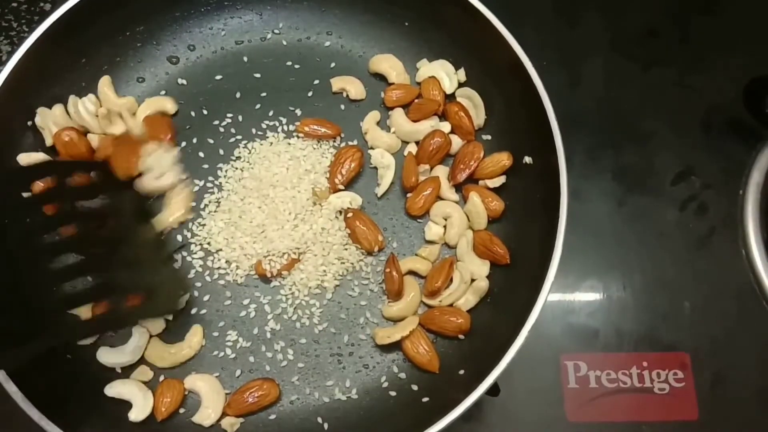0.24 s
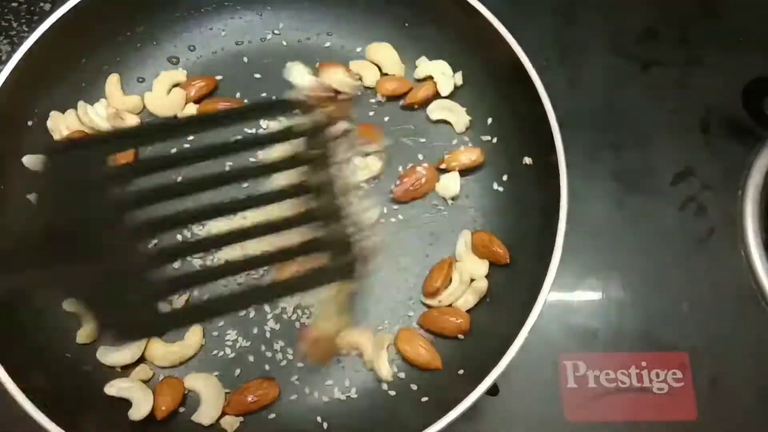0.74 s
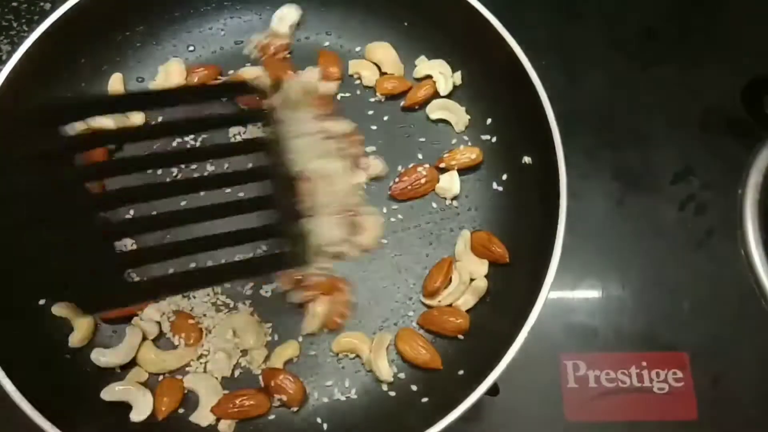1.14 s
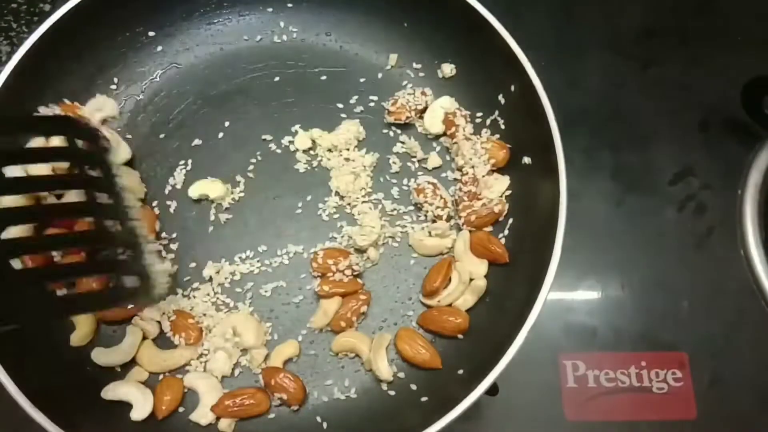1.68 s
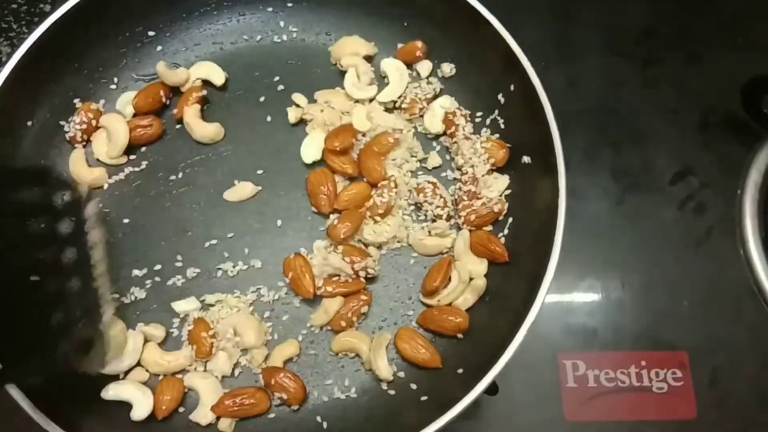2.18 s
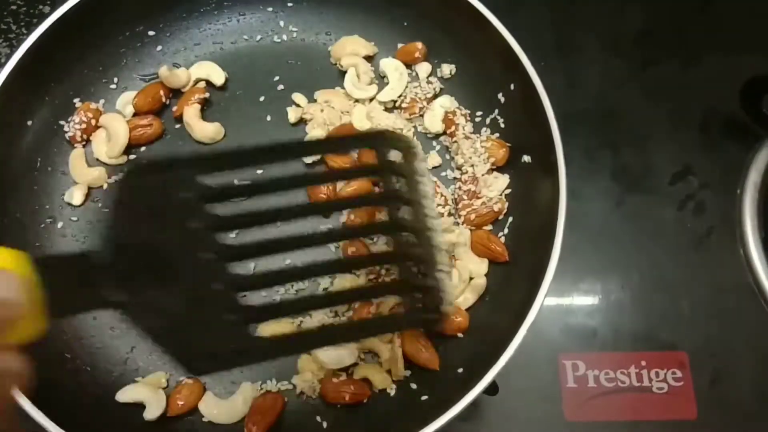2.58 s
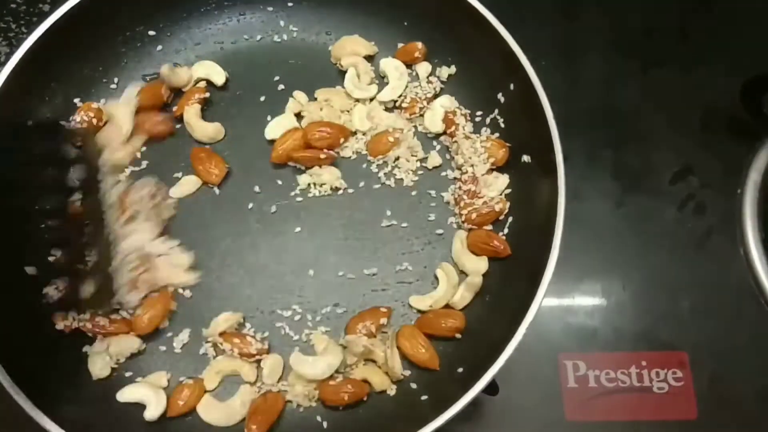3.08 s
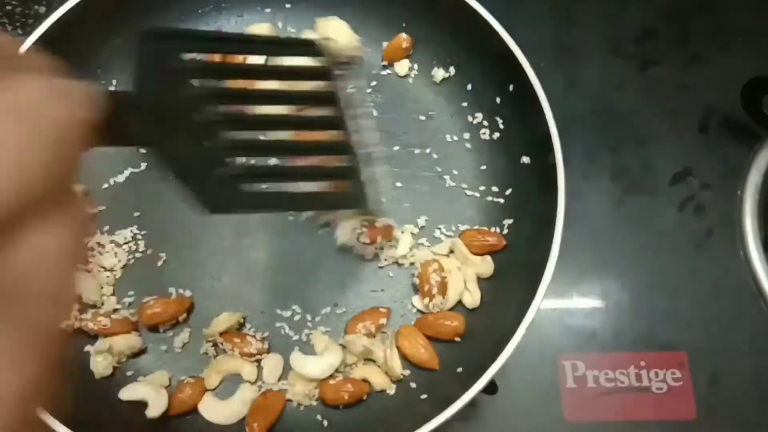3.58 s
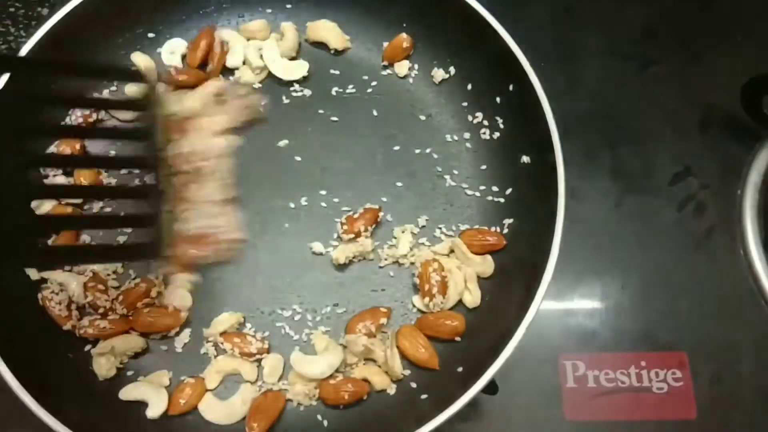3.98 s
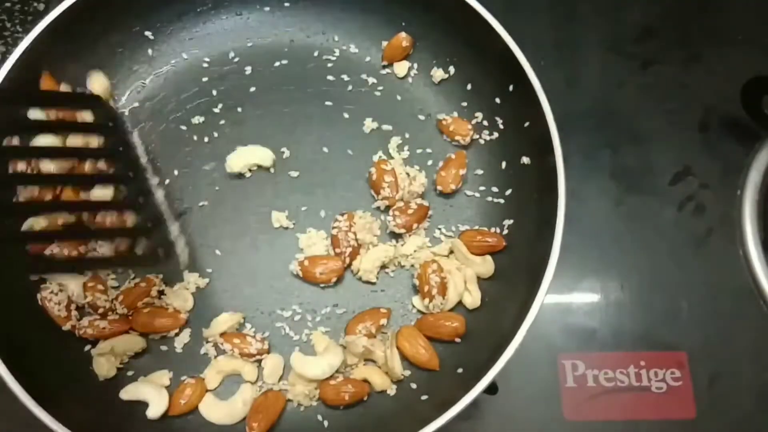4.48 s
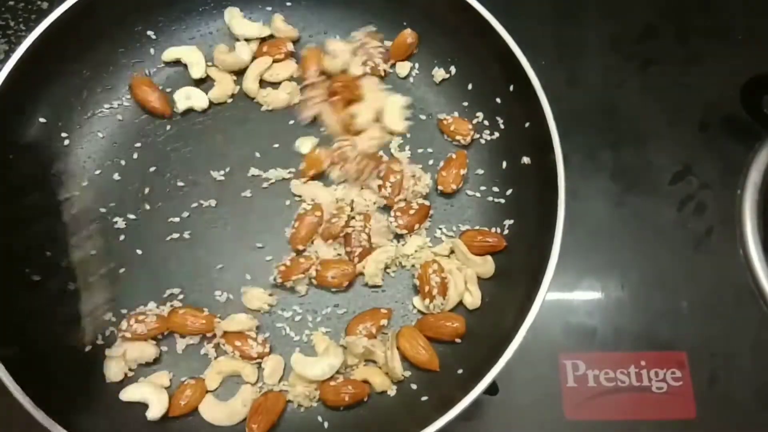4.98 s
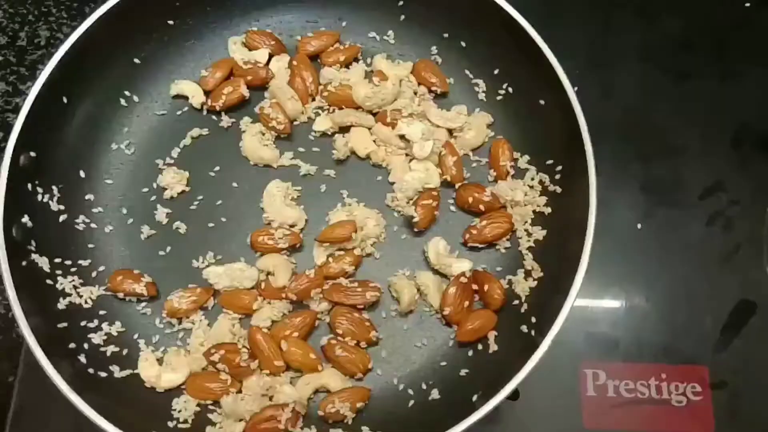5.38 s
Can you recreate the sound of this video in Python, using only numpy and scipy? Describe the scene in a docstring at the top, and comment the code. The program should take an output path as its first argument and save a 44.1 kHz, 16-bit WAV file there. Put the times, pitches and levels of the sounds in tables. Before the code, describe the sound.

A slotted spatula stirs nuts and sesame seeds in a frying pan. After a brief quiet sizzle, quick gritty scrapes come every fraction of a second, each with nuts pattering on metal and a small swell of sizzle. Pan knocks and grate shudders punctuate the strokes, with crisp fat pops between. Close microphone in a small hard-walled kitchen, nearly mono, with faint steady air.

```python
"""A spatula stirs nuts and sesame seeds in a frying pan, close by in a small kitchen.
Scrape, judder and tumbling nuts are random grains driven through the pan's modes; knocks, nut hits and
rim taps are band-limited, damped ringing. Fat sizzles as coloured grains, swells with strokes and spits as
short treble clicks. A few dull bumps, steady air, wide hiss and a short room tail complete it.
Pan sounds and their room tail cut off just before the end, leaving the quiet sizzle."""
import sys
import numpy as np
from scipy import signal
from scipy.fft import rfft, irfft, next_fast_len
from scipy.io import wavfile
from scipy.ndimage import map_coordinates

SR = 44100
rng = np.random.default_rng(int(sys.argv[2]) if len(sys.argv) > 2 else 0)


def bounce(signal):
    """Save signal as a 16-bit WAV file at the path given by the first command-line argument."""
    frames = np.transpose(np.atleast_2d(signal))
    limited = np.clip(frames, -1, 1)
    pcm = np.round(limited * 32767).astype(np.int16)
    wavfile.write(sys.argv[1], SR, pcm)


N = 248723  # samples
TOP_HZ = 15700  # band limit
PAN_CUT_S = 5.577
HAND_RATE_HZ, HAND_DEPTH_DB = 22, 3  # hand pressure wavers


def amp(db):
    """Decibels to gain."""
    return 10 ** (np.asarray(db) / 20)


def unit(x):
    """Scale to rms 1."""
    return x / np.sqrt(np.mean(x ** 2) + 1e-20)


def along(points, hz):
    """Interpolate (f/Hz, value) points on a log frequency axis."""
    f, value = np.transpose(points)
    return np.interp(np.log(hz + 1), np.log(f), value)


def filtered(x, gain):
    """Apply a frequency-dependent gain to x."""
    size = next_fast_len(N + SR // 2)
    hz = np.fft.rfftfreq(size, 1 / SR)
    return irfft(rfft(x, size) * gain(hz), size)[..., :N]


def coloured(x, spectrum):
    """Impose a spectrum on x, at rms 1."""
    return unit(filtered(x, lambda hz: amp(along(spectrum, hz))))


def add(track, start_s, sound):
    """Mix a sound into the track in place."""
    part = track[max(round(start_s * SR), 0):][:len(sound)]
    part += sound[:len(part)]


def grains(rate_hz, spread_db):
    """Random tiny impacts of uneven size and either sign, at rms 1."""
    size = amp(spread_db * np.clip(rng.standard_normal(N), -2, 2))
    signed = size * rng.choice([-1, 1], N)
    return unit(signed * (rng.random(N) < rate_hz / SR))


def wavering(rate_hz, depth_db):
    """Smooth random gain through rate_hz new values a second."""
    knots = rng.standard_normal(4000)
    return amp(depth_db * map_coordinates(knots, [np.arange(N) * rate_hz / SR]))


def effort(starts_s, lengths_s, levels_db, attack_s, sag_db_per_s, release_db_per_s):
    """Gain of a row of gestures: each rises, sags while it lasts, then dies away; powers add."""
    power = np.zeros(N)
    t = np.arange(SR) / SR
    for start_s, length_s, db in zip(starts_s, lengths_s, levels_db):
        fall_db = sag_db_per_s * t + release_db_per_s * np.maximum(t - length_s, 0)
        gain = np.minimum(t / attack_s, 1) * amp(db - fall_db)
        add(power, start_s, gain ** 2)
    return np.sqrt(power)


def snap(low_hz, high_hz, t60_s, spray_db):
    """Band-limited click of peak 1 from random signs, with a fainter, slower spray."""
    t = np.arange(SR // 20) / SR
    envelope = amp(-60 * t / t60_s) + amp(spray_db - 60 * t / 0.12)
    burst = rng.choice([-1, 1], len(t)) * envelope
    edges_hz = np.clip([low_hz, high_hz], 300, TOP_HZ)
    band = signal.butter(2, edges_hz, "bandpass", fs=SR, output="sos")
    click = signal.sosfilt(band, burst)
    return click / abs(click).max()


def excited(ring, low_hz, high_hz, onset_s):
    """One band of a ring, at rms 1 over its onset; low bands build up more slowly."""
    contact_cycles = 0.33  # build-up time constant, in cycles of low_hz
    edges_hz = np.clip([low_hz, high_hz], 30, TOP_HZ)
    band = signal.butter(3, edges_hz, "bandpass", fs=SR, output="sos")
    part = signal.sosfilt(band, ring)
    part = part * (1 - np.exp(-np.arange(len(ring)) / SR * low_hz / contact_cycles))
    return part / part[:round(onset_s * SR)].std()


def touched(ring, rise_s, damping_db_per_s):
    """A ring that builds up during contact and is damped by what stays on the metal."""
    t = np.arange(len(ring)) / SR
    return ring * (1 - np.exp(-t / rise_s)) * amp(-damping_db_per_s * t)


def ringing(modes, vary_db, detune):
    """Sum damped sines, strengths varied and pitches shifted by a random share."""
    t = np.arange(SR * 2 // 5) / SR
    hz, db, t60_s = np.transpose(modes)[:, :, None]
    hz = hz * (1 + detune * rng.standard_normal(hz.shape))
    strength = amp(db + vary_db * rng.standard_normal(hz.shape)) * rng.choice([-1, 1], hz.shape)
    t = t[:round(t60_s.max() * SR)]
    partials = strength * amp(-60 * t / t60_s) * np.sin(2 * np.pi * hz * t)
    return partials.sum(0)


# room noise spectrum: f/Hz, relative level/dB
AIR_SPECTRUM = [(20, -22), (50, -2.5), (110, 4.5), (220, -3.5), (380, 0.5), (600, -5.5), (2000, -12.5),
                (5000, -16), (16000, -26)]


def kitchen_air():
    """Steady room noise, shaped in frequency."""
    return amp(-64.5) * coloured(rng.standard_normal(N), AIR_SPECTRUM)


# side noise spectrum: f/Hz, relative level/dB
SIDE_SPECTRUM = [(30, -10), (200, 2.5), (700, -5), (4000, -7), (6000, -17), (8000, -45), (15000, -24)]


def side_hiss():
    """Faint steady shaped noise that gives width."""
    return amp(-72) * coloured(rng.standard_normal(N), SIDE_SPECTRUM)


# room decay: f/Hz, t60/s
KITCHEN_DECAY = [(100, 0.42), (1000, 0.5), (5000, 0.56), (15000, 0.045)]


def kitchen(x):
    """Hard walls answer with a short noise tail; the highest treble dies first."""
    hz, t, cells = signal.stft(rng.standard_normal(SR // 2), SR, nperseg=256)
    decay = amp(-60 * t / along(KITCHEN_DECAY, hz)[:, None])
    tail = signal.istft(cells * decay, SR, nperseg=256)[1]
    return signal.fftconvolve(x, tail / np.linalg.norm(tail))[:N]


# spatula strokes: start t/s, length/s, scrape level/dB, tumble level/dB, sizzle level/dB
# (levels before the hand's wavering; tumble also before its mix trim)
SPATULA_STROKES = [(0.187, 0.31, -65, -52.5, -69.5), (0.368, 0.078, -53.5, -51.5, -52.5),
                   (0.505, 0.04, -51.5, -63, -46.5), (0.678, 0.11, -50, -47, -56.5),
                   (0.785, 0.15, -59, -49, -50), (1.025, 0.15, -56.5, -46.5, -51),
                   (1.187, 0.24, -52, -50, -56), (1.37, 0.21, -51.5, -52.5, -58),
                   (1.469, 0.13, -44, -45, -52.5), (1.603, 0.063, -48, -48.5, -53),
                   (1.896, 0.1, -53, -52, -59), (1.992, 0.15, -48, -43.5, -55),
                   (2.187, 0.032, -50.5, -87, -64), (2.442, 0.12, -58.5, -55.5, -57),
                   (2.694, 0.038, -54.5, -54.5, -73), (2.768, 0.11, -56.5, -49, -50.5),
                   (2.88, 0.098, -54.5, -53.5, -51), (3.103, 0.22, -66, -53.5, -55),
                   (3.202, 0.061, -46.5, -39, -55.5), (3.314, 0.11, -53, -51, -58),
                   (3.492, 0.15, -49.5, -52.5, -60), (3.65, 0.17, -50, -53, -57),
                   (3.85, 0.26, -58, -53, -61.5), (4.022, 0.13, -49.5, -49, -58.5),
                   (4.167, 0.18, -54.5, -51, -56.5), (4.352, 0.17, -43, -51.5, -51.5),
                   (4.538, 0.36, -53.5, -84, -90), (4.776, 0.24, -49, -49, -54.5),
                   (4.964, 0.13, -56, -46, -71), (5.168, 0.17, -53.5, -52.5, -58.5)]
# sizzle between strokes: t/s, level/dB
SIZZLE_FLOOR = [(0, -67.5), (.5, -59), (2.3, -60), (5.6, -63)]


def frying():
    """Frying gain: swells with each stroke as food is pushed onto fresh hot metal."""
    starts_s, lengths_s, _, _, sizzle_db = np.transpose(SPATULA_STROKES)
    idle_db = np.interp(np.arange(N) / SR, *np.transpose(SIZZLE_FLOOR))
    swell = effort(starts_s, lengths_s, sizzle_db, attack_s=0.053, sag_db_per_s=2, release_db_per_s=95)
    return np.hypot(swell, amp(idle_db))


# sizzle spectrum: f/Hz, relative level/dB
SIZZLE_SPECTRUM = [(700, -33), (2500, -5), (4000, -4.5), (5200, 1), (6500, 5.5), (7600, 7), (9500, 2),
                   (11500, -7), (13500, 5), (15500, -1.5)]


def sizzle():
    """Tiny bubbles burst in the fat: dense fine grains plus sparser ones, coloured."""
    fine = grains(rate_hz=6000, spread_db=2.5)
    coarse = grains(rate_hz=600, spread_db=2.0)
    fizz = coloured(fine + 0.28 * coarse, SIZZLE_SPECTRUM)
    return wavering(HAND_RATE_HZ, HAND_DEPTH_DB) * frying() * fizz


# fat spits and seeds snap: t/s, peak level/dB, centre f/Hz
FAT_POPS = [(0.066, -45, 14500), (0.1864, -33, 13000), (0.6462, -34, 13000), (0.771, -33, 11500),
            (0.8463, -33, 13400), (0.9198, -20.5, 11500), (1.07, -38, 10500), (1.133, -31, 12000),
            (1.246, -42, 12500), (1.282, -28, 12500), (1.7359, -25.5, 7500), (1.748, -31, 6500),
            (1.762, -36, 11000), (1.773, -32, 8100), (2.025, -26.5, 6200), (2.2397, -38, 7400),
            (2.271, -32, 7500), (2.286, -31.5, 8600), (2.738, -39, 12000), (2.782, -34, 13000),
            (2.7892, -23.5, 12300), (2.798, -27, 9000), (2.801, -26.5, 8000), (2.9405, -22.5, 9900),
            (2.951, -26.5, 8100), (2.979, -37, 9500), (2.989, -31, 10800), (3.132, -36.5, 6800),
            (3.1774, -30, 12600), (3.6407, -19.5, 6500), (3.6495, -25.5, 6860), (3.6535, -30, 6300),
            (4.064, -37, 9000), (4.107, -35, 12500), (4.242, -40, 11500), (4.268, -37, 11500),
            (4.328, -37, 13000), (4.367, -38, 14000)]


def faint_spits():
    """Random (t/s, peak level/dB, centre f/Hz) rows whose peaks follow the frying."""
    rate_hz, over_sizzle_db, spread_db = 50, 8.5, 3
    centre_range_hz = (5850, 12600)
    frying_db = 20 * np.log10(frying())
    chance = rng.random((400, 4))
    spits = []
    for when, size, pitch, luck in chance:
        if luck < rate_hz * N / SR / len(chance):
            db = frying_db[int(when * N)] + over_sizzle_db + spread_db * size ** 2
            spits.append((when * N / SR, db, np.interp(pitch, [0, 1], centre_range_hz)))
    return spits


def pops():
    """Each spit of fat or seed snaps in its own treble band."""
    out = np.zeros(N)
    for start_s, db, hz in FAT_POPS + faint_spits():
        add(out, start_s, amp(db) * snap(hz * 0.68, hz * 1.34, t60_s=0.0024, spray_db=-22.5))
    return out


# broad families of lesser pan modes: centre f/Hz, width/Hz (before squaring), level/dB
PAN_FAMILIES = [(140, 49, 5), (271, 355, 0.5), (508, 320, -1.5), (802, 275, 8.5), (1392, 296, 9.5),
                (2120, 490, 4), (2720, 740, -2.5), (3634, 2300, -3), (5560, 860, -0.5), (6350, 1340, 0.5),
                (7330, 730, 2), (9130, 1300, -2), (10750, 700, -0.5)]


def families(hz):
    """Broad pan resonances, squared for steep skirts, over a floor in the valleys."""
    valley_db = -14
    centre_hz, width_hz, db = np.transpose(PAN_FAMILIES)[:, :, None]
    resonance = 1j * hz * width_hz / (centre_hz ** 2 - hz ** 2 + 1j * hz * width_hz)
    return amp(valley_db) + (amp(db) * resonance ** 2).sum(0)


# pan modes on the grate: f/Hz, level/dB, t60/s
PAN_MODES = [(130.4, -2, 0.2), (247.6, -5, 0.12), (294.7, -3, 0.098), (459.5, -7, 0.084), (573, -15, 0.21),
             (755.7, 3.5, 0.085), (821.5, -1.5, 0.063), (916, -10, 0.024), (1011, -15.5, 0.13),
             (1303, -8.5, 0.049), (1354.5, -2.5, 0.14), (1392.5, 5.5, 0.042), (1526, -14.5, 0.022),
             (2037, -6, 0.041), (2094, -6.5, 0.065), (2168, -6, 0.11), (2380, -14, 0.11), (2772, -17, 0.12),
             (3250, -3, 0.072), (3380, -2, 0.033), (3646, -8.5, 0.13), (4630, -3.5, 0.08),
             (5420, -7.5, 0.051), (5599, -7.5, 0.051), (6200, -1.5, 0.04), (6720, 3.5, 0.028),
             (7330, 4.5, 0.083), (7620, -3.5, 0.03), (8800, -6, 0.063), (9500, -3.5, 0.032),
             (10800, -11, 0.041)]


def pan_rings(count, rattle_db, rattle_t60_s, vary_db):
    """Pan answers to count contacts: modes over a short dense rattle in the broad resonances."""
    load_detune = 0.0098  # blade and food load the pan differently each time
    t = np.arange(SR // 4) / SR
    response = families(np.fft.rfftfreq(len(t), 1 / SR))
    noise = irfft(rfft(rng.standard_normal((count, len(t)))) * response, len(t))
    rings = amp(rattle_db - 60 * t / rattle_t60_s) * noise
    for ring in rings:
        add(ring, 0, ringing(PAN_MODES, vary_db, load_detune))
    return rings


def driven(force, spectrum, broad_db, count=48):
    """A force heard through pan resonances and ring, its contact point crossfading through count places."""
    place = np.linspace(0, count - 1, N)
    ring = np.zeros(N)
    answers = pan_rings(count, rattle_db=1.0, rattle_t60_s=0.016, vary_db=2.5)
    for k, answer in enumerate(answers):
        near = np.flatnonzero(abs(place - k) < 1)
        push = force[near] * np.sqrt(1 - abs(place[near] - k))
        add(ring, near[0] / SR, signal.fftconvolve(push, answer))
    broad = amp(broad_db) * unit(filtered(force, families))
    force_rms = np.sqrt(np.mean(force ** 2))
    return coloured(unit(ring) + broad, spectrum) * force_rms


# pan shoved, rocking on the grate: start t/s, length/s, shudder level/dB, judder level/dB
PAN_SHOVES = [(0.216, 0.073, -48.5, -51.5), (0.665, 0.13, -48, -49), (1.041, 0.097, -41.5, -49),
              (1.43, 0.21, -64, -51.5), (1.935, 0.046, -50, -62), (2.336, 0.022, -51.5, -61),
              (3.116, 0.14, -51, -61), (3.897, 0.14, -48.5, -56.5), (4.33, 0.075, -50, -46),
              (4.816, 0.13, -55, -81), (5.12, 0.11, -57, -60.5)]
# stirring spectra: f/Hz, relative level/dB
SHUDDER_SPECTRUM = [(30, -26), (70, 4.5), (130, 6.5), (300, -7.5), (550, -12.5), (750, -16), (1500, -54)]
JUDDER_SPECTRUM = [(100, -20), (220, 4), (310, 4.5), (450, -6), (650, -7.5), (1200, -50)]
TUMBLE_SPECTRUM = [(200, -62), (550, -2), (750, 1.5), (1400, 0.5), (2200, -6), (3500, -7.5), (5000, -6),
                   (9000, -69)]
SCRAPE_SPECTRUM = [(500, -15), (1300, -12.5), (1800, -5), (2800, -5), (4200, -4), (5500, 4), (7500, 1),
                   (10000, -5), (14000, -8)]


def stirring():
    """Pushes shake the pan on its grate, nuts patter on the wall, the blade judders and grinds over seeds."""
    starts_s, lengths_s, scrape_db, tumble_db, _ = np.transpose(SPATULA_STROKES)
    pressure = wavering(HAND_RATE_HZ, HAND_DEPTH_DB)
    sliding = pressure * effort(starts_s, lengths_s, scrape_db,
                                attack_s=0.036, sag_db_per_s=26, release_db_per_s=330)
    tumbling = pressure * effort(starts_s, lengths_s, tumble_db,
                                 attack_s=0.042, sag_db_per_s=14.3, release_db_per_s=155)

    shove_starts_s, shove_lengths_s, shudder_db, judder_db = np.transpose(PAN_SHOVES)
    shove_shape = dict(attack_s=0.014, sag_db_per_s=13, release_db_per_s=177)
    push = effort(shove_starts_s, shove_lengths_s, shudder_db, **shove_shape)
    drag = effort(shove_starts_s, shove_lengths_s, judder_db, **shove_shape)
    resting = amp(-66.5) * (np.arange(N) / SR > starts_s[0])  # blade in the pan from first touch

    shaking = np.hypot(push, resting) * grains(rate_hz=540, spread_db=-0.5)
    shudder = driven(shaking, SHUDDER_SPECTRUM, broad_db=5.5)
    dragging = np.hypot(amp(-6.5) * sliding, drag) * grains(rate_hz=580, spread_db=-0.5)
    judder = driven(dragging, JUDDER_SPECTRUM, broad_db=5.0)
    patter = tumbling * grains(rate_hz=230, spread_db=2.0)
    nuts = amp(-3.0) * driven(patter, TUMBLE_SPECTRUM, broad_db=-2.0)
    catching = wavering(150, 1.5)  # seeds catch under the blade and slip free
    grinding = sliding * catching * grains(rate_hz=1600, spread_db=1.5)
    scrape = driven(grinding, SCRAPE_SPECTRUM, broad_db=0.5)
    return shudder + judder + nuts + scrape


# blade strikes pan: t/s, ring level/dB, ring centre f/Hz, thump level/dB, thump centre f/Hz,
# edge click level/dB, ring build-up/s, damping by the blade/(dB/s)
BLADE_KNOCKS = [(0.209, -45, 1690, -46.5, 332, -51, 0.00031, 30),
                (0.672, -47, 950, -44, 220, -68, 0.00086, 200),
                (0.6827, -32, 1470, -37.5, 254, -38, 0.00033, 90),
                (0.742, -45, 1910, -54, 300, -57, .0005, 30),
                (1.057, -44.5, 1600, -50.5, 274, -64, 0.0009, 23),
                (1.111, -47, 1310, -53, 276, -51.5, 0.0016, 30),
                (1.4354, -37, 860, -41.5, 328, -65, 0.0015, 60),
                (3.2031, -30.5, 960, -46, 327, -69, 0.0023, 60),
                (3.224, -41.5, 1800, -48, 140, -55, 0.0025, -1),
                (3.7924, -35.5, 2050, -59, 200, -47, 0.0013, 25),
                (3.898, -41.5, 1350, -55, 222, -48, 0.0021, 25),
                (3.931, -45, 1990, -47, 130, -52, 0.00072, 30),
                (4.3165, -27, 680, -31, 332, -59, 0.0021, 40),
                (4.329, -40.5, 1500, -33, 298, -45.5, 0.00054, 60),
                (4.755, -47, 1040, -60.5, 304, -36, 0.00039, 34),
                (5.5, -44.5, 815, -43.5, 280, -56, 0.0022, 150),
                (5.517, -36, 1580, -44, 266, -38.5, .0003, 952)]


def knocks():
    """The blade cracks on the pan, rings it around one pitch, thumps it on the grate, clicks with its edge."""
    out = np.zeros(N)
    t = np.arange(SR // 10) / SR
    thump_ratio = 2 ** 1  # one octave either side
    crack_db, crack_t60_s, crack_hz = -9.5, 0.019, (2570, 5500)
    rings = pan_rings(len(BLADE_KNOCKS), rattle_db=6.0, rattle_t60_s=0.11, vary_db=3.5)
    for row, ring in zip(BLADE_KNOCKS, rings):
        start_s, ring_db, hz, thump_db, thump_hz, edge_db, rise_s, damping_db_per_s = row
        ring_ratio = 2 ** (0.66 * (hz / 1540) ** 0.52)  # higher rings get wider bands
        struck = touched(ring, rise_s, damping_db_per_s)
        crack = amp(-60 * t / crack_t60_s) * rng.standard_normal(len(t))
        crack_level_db = (ring_db + edge_db) / 2 + crack_db
        add(out, start_s, amp(ring_db) * excited(struck, hz / ring_ratio, hz * ring_ratio, .012))
        thump = excited(ring, thump_hz / thump_ratio, thump_hz * thump_ratio, .025)
        add(out, start_s, amp(thump_db) * thump)
        add(out, start_s, amp(edge_db) * excited(ring, 3400, 9500, .012))
        add(out, start_s, amp(crack_level_db) * excited(crack, *crack_hz, .012))
    return out


# single nuts hit the wall: t/s, level/dB, centre f/Hz
WALL_HITS = [(0.226, -47, 2020), (0.275, -47.5, 2010), (0.294, -54, 2100), (0.427, -48, 750),
             (0.453, -59, 720), (0.506, -49, 1170), (0.7, -47.5, 3200), (0.722, -49, 3000),
             (0.774, -46.5, 1700), (0.815, -43.5, 1430), (0.896, -44.5, 840), (0.919, -48.5, 850),
             (0.992, -52, 840), (1.073, -51, 1940), (1.153, -52, 836), (1.169, -50.5, 1660),
             (1.2385, -42.5, 1130), (1.241, -52, 2050), (1.255, -44, 1550), (1.453, -49.5, 1500),
             (1.565, -53, 1380), (1.734, -52.5, 1390), (2.031, -42.5, 1660), (2.073, -40, 900),
             (2.104, -36.5, 1300), (2.116, -50.5, 1400), (2.076, -51, 3000), (2.15, -47, 1710),
             (2.173, -49, 1950), (2.216, -50, 1160), (2.49, -57, 1000), (2.535, -63, 826),
             (2.755, -48, 1730), (2.758, -55, 2900), (2.772, -55, 2160), (2.84, -55, 1400),
             (2.92, -57, 850), (3.025, -55, 770), (3.184, -52, 1400), (3.2065, -44, 1980),
             (3.237, -42, 1290), (3.249, -40, 845), (3.29, -44, 760), (3.328, -47, 1520),
             (3.351, -44.5, 1520), (3.372, -53, 1840), (3.416, -54, 1500), (3.498, -50, 880),
             (3.526, -51.5, 1500), (3.675, -53, 810), (3.722, -58, 1390), (3.811, -42, 1970),
             (4.078, -51, 1480), (4.143, -46, 880), (4.18, -44.5, 1110), (4.249, -51, 1400),
             (4.385, -41, 720), (4.4714, -48, 1470), (4.495, -51.5, 1460), (4.926, -51.5, 1230),
             (4.9886, -39, 1180), (5.0173, -45, 2700), (5.087, -45.5, 1590), (5.202, -57.5, 2240),
             (5.2865, -41.5, 1080), (5.289, -47.5, 2000), (5.5, -52, 3470)]


def nut_hits():
    """A light nut rings only a narrow family of modes, damped by food on the metal."""
    out = np.zeros(N)
    ratio = 2 ** 0.55  # octaves either side
    rings = pan_rings(len(WALL_HITS), rattle_db=3.5, rattle_t60_s=0.21, vary_db=4.5)
    for (start_s, db, hz), ring in zip(WALL_HITS, rings):
        damped = touched(ring, rise_s=0.00072, damping_db_per_s=124)
        add(out, start_s, amp(db) * excited(damped, hz / ratio, hz * ratio, .012))
    return out


def left_tick():
    """One sharp dry treble tick, for the left channel."""
    out = np.zeros(N)
    add(out, .8463, amp(-18) * snap(4000, 15500, t60_s=.0025, spray_db=-40))
    return out


# thin, long partials of the bare rim, undamped by food: f/Hz, level/dB, t60/s
RIM_MODES = [(2170, -15, 0.64), (2960, -8, 0.32), (3245, -2, 0.029), (3735, -10, 0.39), (4540, -15.5, 0.48),
             (5460, -3, 0.13), (5600, 0.5, 0.14), (5932, -13, 0.21), (6310, 3, 0.17), (6470, 0.5, 0.11),
             (6940, -15, 0.3), (7446, -2.5, 0.19), (7200, 8, 0.18), (7630, -8.5, 0.19), (8450, -7, 0.15),
             (8860, -20, 0.45), (10140, -16, 0.25), (11070, -8, 0.17)]
# blade taps the rim: t/s, ring level/dB, clack level/dB
BLADE_RIM_TAPS = [(1.9188, -39.5, -45), (4.754, -33.5, -34), (4.7635, -41, -38)]


def rim_taps():
    """The blade clacks as band-limited noise against the rim, which rings on thinly."""
    out = np.zeros(N)
    clack_hz, clack_t60_s = (5100, 9600), 0.057
    t = np.arange(SR // 8) / SR
    for start_s, ring_db, clack_db in BLADE_RIM_TAPS:
        ring = ringing(RIM_MODES, vary_db=1.5, detune=0)
        clack = amp(-60 * t / clack_t60_s) * rng.standard_normal(len(t))
        add(out, start_s, amp(ring_db) * excited(ring, 1000, TOP_HZ, .012))
        add(out, start_s, amp(clack_db) * excited(clack, *clack_hz, .012))
    return out


# dull bumps near the microphone: t/s, level/dB, nominal f/Hz (glides from 1.52 to 0.42 times this),
# t60/s, tick peak level/dB
DULL_BUMPS = [(3.5795, -15.5, 140, 0.05, -12.5), (4.212, -39.5, 154, 0.089, -49),
              (4.489, -38, 110, 0.1, -48)]


def bumps():
    """A dry contact tick, then a soft low push that slows as it dies."""
    out = np.zeros(N)
    t = np.arange(SR // 8) / SR
    for start_s, db, hz, t60_s, tick_db in DULL_BUMPS:
        turns = np.cumsum(hz * (.42 + 1.1 * np.exp(-t / .007))) / SR
        envelope = amp(db - 60 * t / t60_s) * (1 - np.exp(-t / 0.00052))
        add(out, start_s, -envelope * np.sin(2 * np.pi * turns))
        add(out, start_s - .0006, amp(tick_db) * snap(1800, 7900, t60_s=0.0034, spray_db=-30.0))
    return out


def scene():
    """Pan, fat, bumps and air sit in the middle; hiss gives width, one tick is left only."""
    fat = sizzle() + pops()
    pan = stirring() + knocks() + nut_hits() + rim_taps()
    before_cut = np.arange(N) / SR < PAN_CUT_S
    pan_in_room = before_cut * (pan + amp(-9.5) * kitchen(pan))
    fat_in_room = fat + amp(-10) * kitchen(fat)
    mid = pan_in_room + fat_in_room + bumps() + kitchen_air()
    side = side_hiss()
    return np.array([mid + side + left_tick(), mid - side])


def record(dry):
    """Steep low-pass at the band limit."""
    return filtered(dry, lambda hz: 1 / (1 + (hz / TOP_HZ) ** 160))


dry = scene()
out = record(dry)
bounce(out)
```